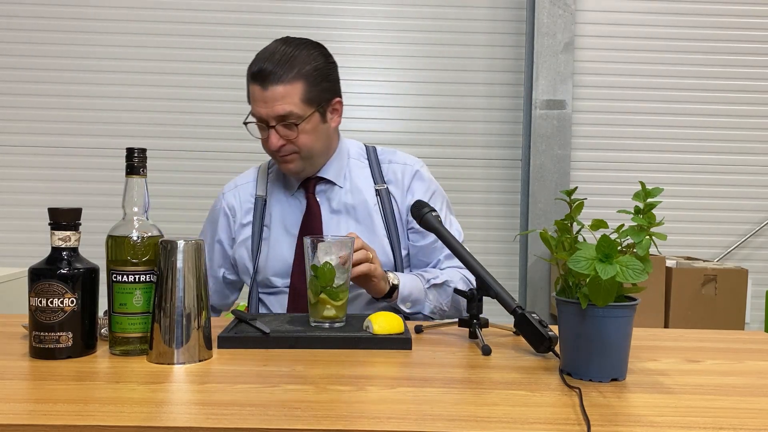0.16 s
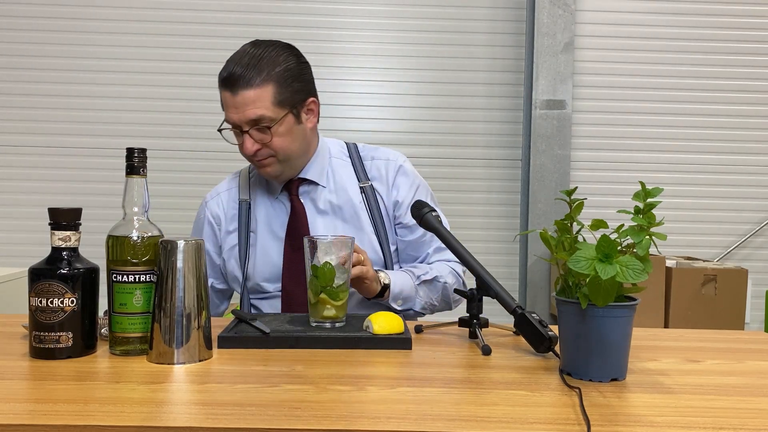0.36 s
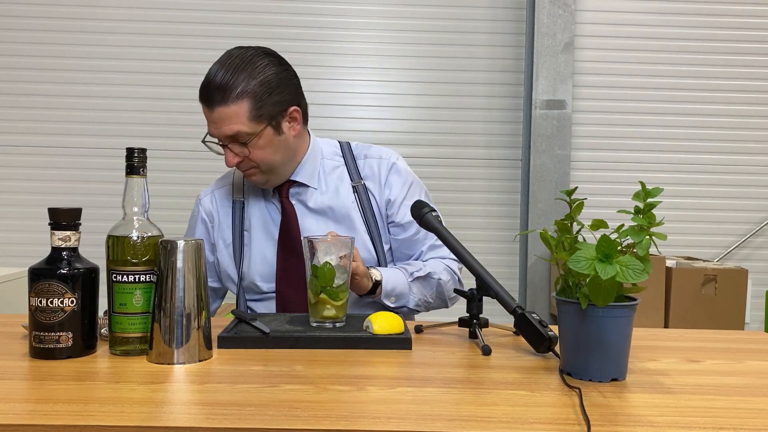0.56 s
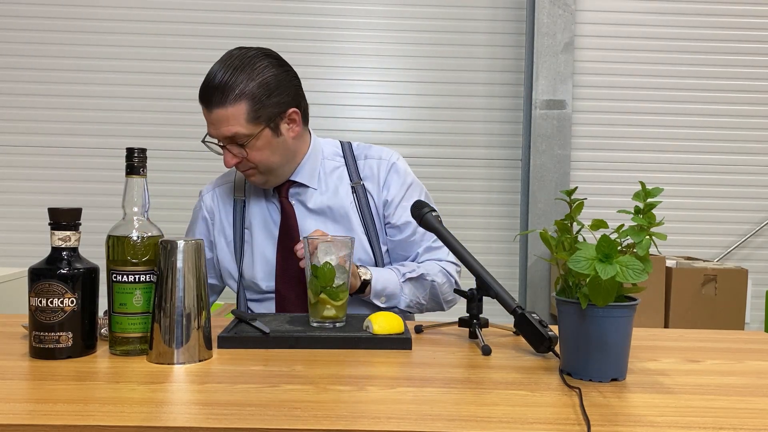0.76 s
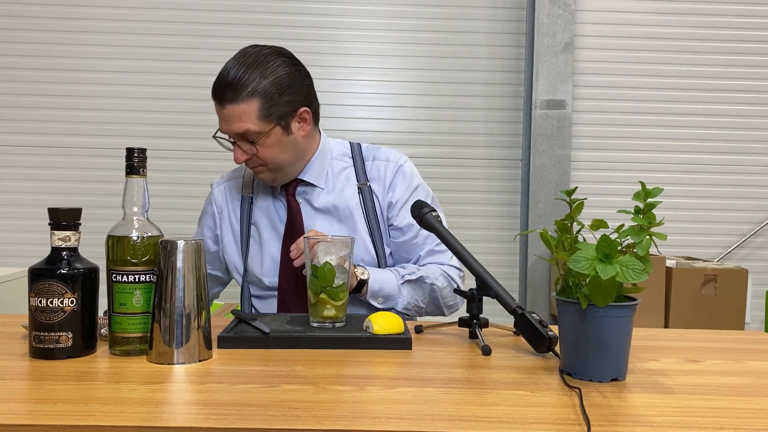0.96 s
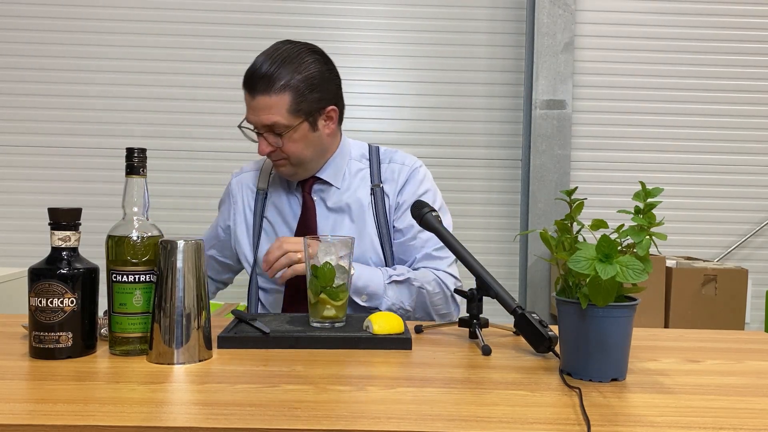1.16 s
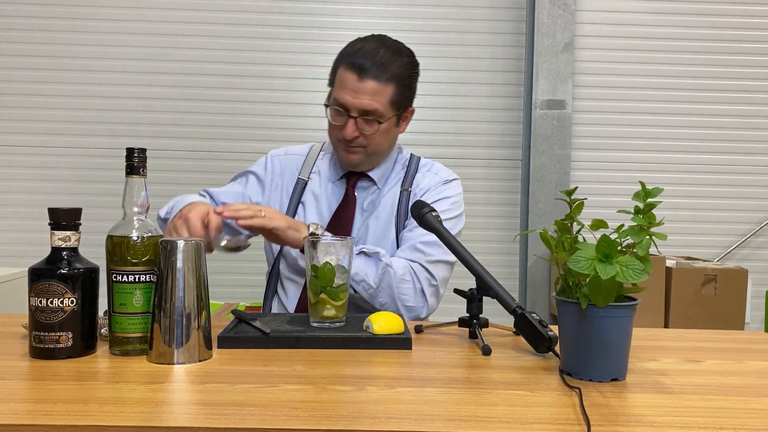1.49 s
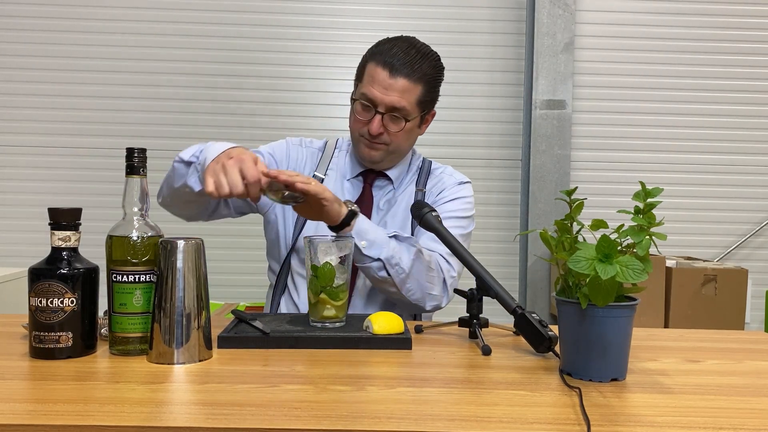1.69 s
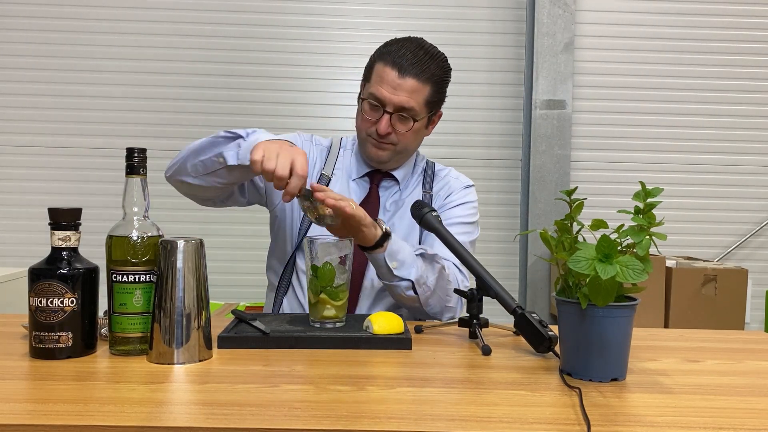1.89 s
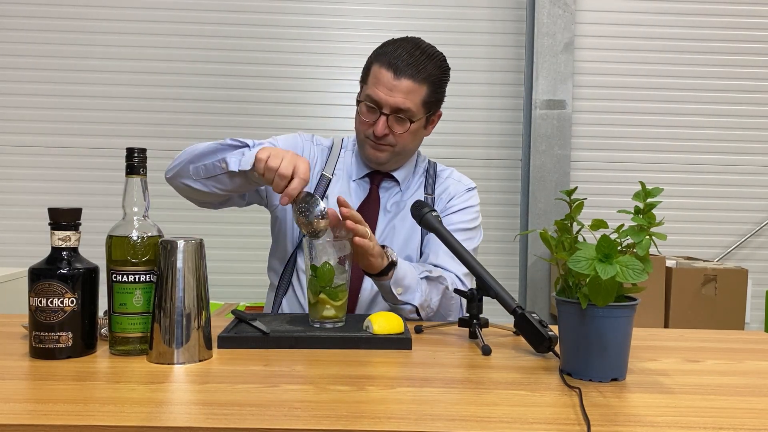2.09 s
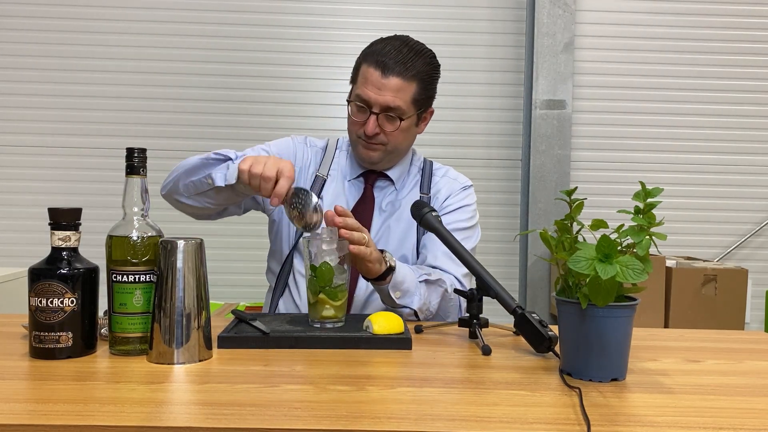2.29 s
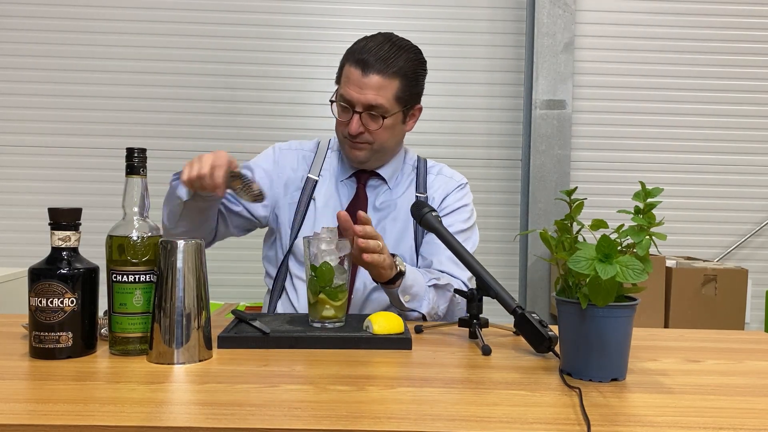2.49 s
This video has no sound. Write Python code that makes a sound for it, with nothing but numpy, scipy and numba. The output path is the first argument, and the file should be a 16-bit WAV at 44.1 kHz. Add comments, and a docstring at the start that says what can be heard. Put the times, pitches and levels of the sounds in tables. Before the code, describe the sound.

A scoop digs noisily through ice cubes, a quiet pause, then cubes clatter into a glass

```python
"""Ice scooped into a glass

A scoop digs through a plastic bin of ice cubes below a counter, is lifted, and tips cubes into a hand-held glass.
Knocks are skidding contacts, short noise bursts that excite decaying partials of cube, bin wall, glass or counter.
The churn and the shifting in the scoop are dense random sprays of damped sines, coloured by a spectrum.
The counter thuds into the microphone stand, a thin whistle wavers, and a bare hall rings on as decaying noise.
"""
import sys
import numpy as np
from scipy import signal
from scipy.fft import rfft, irfft
from scipy.io import wavfile
from scipy.ndimage import uniform_filter1d
from numba import njit

SR = 44100
rng = np.random.default_rng(int(sys.argv[2]) if len(sys.argv) > 2 else 0)


def master_out(mix):
    """Clip the mix to full scale and print it as 16-bit PCM to the path in sys.argv[1]."""
    frames = np.transpose(np.atleast_2d(mix))
    ceiling = np.clip(frames, -1, 1)
    pcm = np.round(ceiling * 32767).astype(np.int16)
    wavfile.write(sys.argv[1], SR, pcm)


def ratio_of_db(decibels):
    """Turn decibels (scalar or array-like) into linear amplitude factors; 0 dB maps to 1."""
    return 10 ** (np.asarray(decibels, float) / 20)


N = 116865
LEAD = SR // 2  # samples computed before time 0, so that earlier sound can ring into the start


def on_log(hz, table):
    """Logarithmic frequency scale: reads a (frequency [Hz], value) table on a log axis."""
    table = np.array(table)
    return np.interp(np.log(np.maximum(hz, 1)), np.log(table[:, 0]), table[:, 1])


def unit(x):
    """Normalisation: scales a signal to rms 1."""
    return x / np.sqrt(np.mean(x ** 2))


def tint(x, table):
    """Linear filtering: applies a (frequency [Hz], gain [dB]) table to the spectrum."""
    hz = np.fft.rfftfreq(len(x), 1 / SR)
    return irfft(rfft(x) * ratio_of_db(on_log(hz, table)), len(x))


def envelope(t, s, db):
    """Amplitude envelope: level [dB] interpolated over time [s], near silence outside the table."""
    return ratio_of_db(np.interp(t, s, db, left=-120, right=-120))


def place(out, s, db, y):
    """Superposition: adds a sound at a time [s] with a peak level [dB]."""
    i = LEAD + int(s * SR)
    y = y[:len(out) - i]
    out[i:i + len(y)] += y * ratio_of_db(db) / np.abs(y).max()


def contact(length_s):
    """Frictional contact: a short rattle of tiny impacts that swells and dies."""
    t = np.arange(SR // 40) / SR
    impacts = rng.standard_normal(len(t)) * rng.exponential(size=len(t))
    x = impacts * np.exp(-(t / length_s) ** 2) * np.minimum(t / 0.00072, 1)
    return x / np.sqrt(np.sum(x ** 2))


def ring(modes, chance, detune=0.015):
    """Modal decay: damped partials, weighted and tuned a little differently at every blow."""
    t = np.arange(SR // 4) / SR
    scatter_db = 3
    y = np.zeros(len(t))
    for (hz, db, t60), c, k in zip(modes, chance, np.roll(chance, 1)):
        decay = np.exp(-np.log(1000) * t / max(t60, .003))
        y += ratio_of_db(db + scatter_db * c) * np.sin(2 * np.pi * hz * (1 + detune * k) * t) * decay
    return y


def clack(push, hz, crack_db, top_hz, chance):
    """Impact radiation of a cube: three heavily damped partials and a broadband crack."""
    partials = [(hz, 0, .008), (1.51 * hz, -6, .005), (0.615 * hz, -10, .006)]  # (Hz, dB, t60 s)
    y = signal.fftconvolve(push, ring(partials, chance, detune=0.029))
    band = signal.butter(3, [.4 * hz, min(top_hz, 15000)], "band", fs=SR)
    y[:len(push)] += ratio_of_db(crack_db) * signal.lfilter(*band, push)
    return y


@njit
def grains(n, start, hz, cycles, size):
    """Damped oscillation: each grain is a rotating phasor that decays over a number of cycles."""
    y = np.zeros(n)
    for k in range(len(start)):
        step = np.exp(2j * np.pi * hz[k] / SR - hz[k] / (cycles * SR))
        z = size[k] + 0j
        for i in range(start[k], min(n, start[k] + int(6 * cycles * SR / hz[k]))):
            y[i] += z.imag
            z *= step
    return y


def rattle(per_s, scatter_db, cycles, tilt_db):
    """Poisson process: random knocks, each six grains spread over 6 ms; tilt in dB per octave."""
    n, knocks = LEAD + N, 8000
    gaps = rng.exponential(size=(knocks, 1))
    strength = np.minimum(rng.exponential(size=(knocks, 1)), 3)
    delay, pitch = rng.random((2, knocks, 6))
    start = (np.cumsum(gaps)[:, None] / per_s + .006 * delay) * SR
    hz = 100 * 150 ** pitch  # 100 Hz to 15 kHz, even per octave
    size = ratio_of_db(scatter_db * strength + tilt_db * np.log2(hz / 700))
    keep = start < n
    return grains(n, start[keep].astype(np.int64), hz[keep], 1. * cycles, size[keep])


# churn of cubes in the bin: (time [s], level before a common trim [dB])
CHURN_LEVEL = [(0.196, -60), (.212, -40), (0.237, -13), (.3, -15), (.42, -19.5), (0.597, -20),
               (0.669, -31.5), (.72, -27.5), (0.789, -26.5), (.84, -30), (0.901, -41), (.92, -30),
               (.96, -23), (1.02, -30.5), (1.12, -23.5), (1.189, -43.5), (1.216, -20.5), (1.269, -40),
               (1.299, -40), (1.42, -52)]
# spectral weighting of the churning knocks: (frequency [Hz], gain [dB])
CHURN_COLOUR = [(53, -20.5), (100, -22.5), (229, -1.5), (499, -6.5), (977, -10.5), (1090, -11.5),
                (2710, -14.5), (13500, -39), (16000, -64)]


def bin_churn(t):
    """Stochastic superposition: the scoop churns the cubes into a dense stream of knocks."""
    s, db = np.array(CHURN_LEVEL).T
    knocks = rattle(per_s=2000, scatter_db=3, cycles=4.3, tilt_db=5)
    return unit(tint(knocks, CHURN_COLOUR)) * envelope(t, s, db) * ratio_of_db(-2.5)


# loud knocks in the bin: (time [s], peak level [dB], cube pitch [Hz], gain of wall boom [dB])
BIN_BLOWS = [(0.211, -19, 2280, -17), (0.234, -5, 1060, 20), (0.261, -2, 1190, -10.5),
             (0.279, 3.5, 1320, 4), (0.331, -0.5, 740, -18), (0.357, -8.5, 2770, -15),
             (0.372, -4, 725, -16.5), (0.408, -2.5, 1140, -27), (0.44, -7.5, 2700, 1.5),
             (0.477, -4.5, 2090, -17), (0.555, -1.5, 1136, -5), (0.5904, 1, 1720, 1),
             (0.693, -5, 1540, -9.5), (0.756, -9.5, 710, -10.5), (0.784, -21, 3000, -13),
             (0.818, -13, 1810, -7), (0.912, -13, 1040, 3), (0.935, -19, 2900, -10), (0.959, 0, 2150, -2),
             (1.038, -12.5, 1080, -9), (1.079, -16.5, 1110, -12), (1.108, -3.5, 1060, -8),
             (1.204, -8, 754, 8), (1.243, -17, 2690, 7), (1.307, -23, 2450, -7)]
# modes of the bin walls: (frequency [Hz], level [dB], t60 [s])
BIN_MODES = [(234.7, -16.5, 0.25), (268.7, 2, 0.05), (379, 2, 0.04), (506, 4, 0.034), (612, 6.5, 0.031),
             (1040, -10, 0.14), (2200, -25, 0.011)]


def bin_knocks(t):
    """Forced modal vibration: single cubes knock the walls, which radiate no deep bass."""
    out = np.zeros(len(t))
    for s, db, hz, boom_db in BIN_BLOWS:
        push = contact(0.0053)
        chance = rng.standard_normal(len(BIN_MODES))
        pulse = np.hanning(len(push))[::12] / 40  # a smooth push of about 2 ms
        boom = signal.fftconvolve(pulse, np.pad(ring(BIN_MODES, chance), (0, len(push))))
        y = clack(push, hz, 8.5, 5000, chance)
        place(out, s, db, y + ratio_of_db(boom_db) * boom[:len(y)])
    return signal.sosfilt(signal.butter(4, 190, "high", fs=SR, output="sos"), out)


# cubes striking the glass and each other: (time [s], peak level of clack [dB], cube pitch [Hz],
# glass ring relative to clack before a common 1 dB lift [dB], counter thud relative to clack [dB])
GLASS_BLOWS = [(2.0469, -11.5, 4630, -2, -3.5), (2.0521, -10, 4000, -40, -11),
               (2.082, -10.5, 1790, -27, -17), (2.0954, -13, 3940, -12.5, -8.5),
               (2.1101, -13.5, 2200, -6, -10), (2.1211, -22, 2100, -28, -3), (2.1386, -32.5, 1250, -30, 8),
               (2.1517, -43, 2000, -22, -20), (2.1745, -45, 4840, -12, 5), (2.1961, -2, 4900, -16, -16.5),
               (2.2043, -8.5, 4800, -35, -10), (2.2547, -28.5, 4700, -28, -1.5),
               (2.2836, -21, 1380, -40, -13), (2.3118, -25, 1930, -6, -7),
               (2.3425, -10.5, 4530, -11.5, -14.5), (2.3574, -14, 2160, -1, -42),
               (2.3625, -10.5, 4680, -29.5, -11), (2.37, -5, 5670, -40, -15.5),
               (2.3802, -17.5, 5280, -1, -12), (2.393, -12, 4800, -33, -11), (2.446, -30.5, 2130, -32, -1)]
# modes of the glass: (frequency [Hz], level before softening by the cube [dB], t60 [s])
GLASS_MODES = [(825, -6, 0.08), (2010, 0, 0.09), (2080, -2, 0.09), (4490, 0, 0.03), (4840, -7, 0.04),
               (5537, -2, .025), (7630, 3, 0.028), (7360, -9, 0.05), (11420, 0, 0.045), (12920, -2, 0.032)]
# modes of counter and stand: (frequency [Hz], level [dB], t60 [s])
COUNTER_MODES = [(50.8, -4.5, 0.5), (124, -6, 0.13), (187.7, 6, 0.27), (205.1, 0.5, 0.33),
                 (289, 5.5, 0.063), (370, 2.5, 0.035), (437.4, 5.5, 0.079)]


def glass(t):
    """Modal excitation: each cube clacks, rings the glass while in contact and jolts the counter."""
    clinks, bells, thuds = np.zeros((3, len(t)))
    soft_db_per_octave = 7  # ring lost above the cube's own pitch
    for s, db, hz, ring_db, thud_db in GLASS_BLOWS:
        push = contact(0.0048)
        chance = rng.standard_normal(len(GLASS_MODES))
        modes = [(f, g - soft_db_per_octave * max(np.log2(f / hz), 0), t60) for f, g, t60 in GLASS_MODES]
        bell = signal.fftconvolve(push, ring(modes, chance, detune=0.0068))
        jolt = ring(COUNTER_MODES, chance[::-1], detune=.02)
        thud = signal.fftconvolve(np.hanning(90), jolt) * np.sign(chance[0])
        place(clinks, s, db, clack(push, hz, 6, 2.2 * hz, chance))
        place(bells, s, db + ring_db + 1, bell)
        place(thuds, s + 0.0016, db + thud_db, thud)
    return clinks, bells, thuds


# wet cubes shifting in the lifted scoop: (time [s], level [dB])
SHIFT_LEVEL = [(1.25, -70.5), (1.4, -50), (1.601, -55.5), (1.75, -51), (1.93, -55.5), (2.02, -49),
               (2.1, -41), (2.65, -57.5)]
# spectral weighting of the shifting: (frequency [Hz], gain [dB])
SHIFT_SPECTRUM = [(24, -28), (40, -14.5), (159, -16), (237, -2.5), (715, -19.5), (1070, -5.5), (2380, -6),
                  (4130, -2), (10700, -19.5), (16000, -25)]
# two clinks before the start, heard only by their echo, then cubes clicking in the metal scoop: (time [s], peak
# level [dB], cube pitch [Hz])
SCOOP_CLICKS = [(-.16, -13.5, 2050), (-.12, -14.5, 4100), (1.736, -36.5, 3800), (1.7707, -43, 3500),
                (1.958, -37, 2870), (1.9694, -28.5, 4340), (1.9894, -21.5, 4980), (1.995, -23.5, 4130),
                (2.0091, -27, 3820), (2.0226, -25, 5100), (2.029, -24, 4900)]


def scoop(t):
    """Granular friction: wet cubes shift as a faint rattle and single ones click; two clinks before the start
    leave only their echo."""
    s, db = np.array(SHIFT_LEVEL).T
    knocks = rattle(per_s=2400, scatter_db=1.3, cycles=8.2, tilt_db=2.2)
    out = unit(tint(knocks, SHIFT_SPECTRUM)) * envelope(t, s, db)
    for s, db, hz in SCOOP_CLICKS:
        place(out, s, db, clack(contact(.005), hz, 7.6, 1.75 * hz, rng.standard_normal(3)))
    return out


# thin, broken whistle: (time [s], centre frequency [Hz], mean level [dB])
HIGH_WHISTLE = [(1.71, 10100, -80), (1.82, 10900, -74), (1.95, 10800, -79)]
# lower whistle that joins it: (time [s], centre frequency [Hz], mean level [dB])
LOWER_WHISTLE = [(1.8, 5600, -74), (1.95, 6200, -73)]


def whistles(t):
    """Frequency and amplitude modulation: slow noise wavers the pitch and breaks up the level."""
    out = np.zeros(len(t))
    for table in (HIGH_WHISTLE, LOWER_WHISTLE):
        s, hz, db = np.array(table).T
        waver = unit(uniform_filter1d(rng.standard_normal(len(t)), size=150))
        breaks = unit(uniform_filter1d(rng.standard_normal(len(t)), size=700))
        pitch = np.interp(t, s, hz) * (1 + .025 * waver)
        tone = np.sin(2 * np.pi * np.cumsum(pitch) / SR)
        out += envelope(t, s, db) * ratio_of_db(6 * breaks) * tone
    return out


# decay of the hall: (frequency [Hz], t60 [s])
HALL_DECAY = [(200, 0.59), (2000, 0.81), (7000, 0.7), (14000, 0.31)]


def hall():
    """Diffuse reverberation: an impulse response of noise whose bands die at their own rates."""
    f, s, z = signal.stft(rng.standard_normal(SR), SR, nperseg=256)
    decay_db = -60 * s / on_log(f, HALL_DECAY)[:, None]
    h = signal.istft(z * ratio_of_db(decay_db), SR, nperseg=256)[1]
    rise_s = 0.0018
    h *= np.clip(np.arange(len(h)) / (rise_s * SR), 0, 1) ** 2
    return h / np.sqrt(np.sum(h ** 2))


# spectrum of the background air: (frequency [Hz], relative level per Hz [dB])
AIR_SPECTRUM = [(15, -32), (25, -4.5), (180, -1.5), (451, -18), (14400, -26), (16000, -52)]


def air(t):
    """Stationary coloured noise: a steady, faint background at -69 dB rms."""
    return ratio_of_db(-69) * unit(tint(rng.standard_normal(len(t)), AIR_SPECTRUM))


def scene():
    """Mid/side superposition: nearly mono, with a mostly treble side of echo and delayed mid."""
    t = (np.arange(LEAD + N) - LEAD) / SR
    ice = bin_churn(t) + bin_knocks(t)
    clinks, bells, thuds = glass(t)
    lifted = scoop(t) + whistles(t)
    # the thuds reach the stand through the counter and excite no hall
    send = ratio_of_db(-8.5) * ice + ratio_of_db(-19) * (clinks + lifted) + ratio_of_db(-11.5) * bells
    echo = signal.fftconvolve(send, hall())[:len(t)]
    side_echo = signal.fftconvolve(send, hall())[:len(t)]
    mid = ice + clinks + bells + thuds + lifted + echo + air(t)
    # side weighting (frequency [Hz], gain [dB])
    side_gain = [(100, -45), (500, -40), (2000, -21), (6000, -16.5), (14000, -11.0)]
    side = tint(ratio_of_db(-7.5) * side_echo + ratio_of_db(-8.5) * np.roll(mid, 20), side_gain)
    return np.array([mid + side, mid - side])[:, LEAD:]


def roll_off(x):
    """The treble ends steeply here."""
    return signal.sosfilt(signal.butter(12, 16470, fs=SR, output="sos"), x)


def record(dry):
    """Band limitation: the microphone chain cuts the deep bass and the top."""
    top_cut = signal.ellip(8, .2, 60, 15300, fs=SR, output="sos")
    bass_cut = signal.butter(4, 40, "high", fs=SR, output="sos")
    mix = signal.sosfilt(bass_cut, signal.sosfilt(top_cut, dry))
    return roll_off(mix)


dry = scene()
out = record(dry)
master_out(out)
```